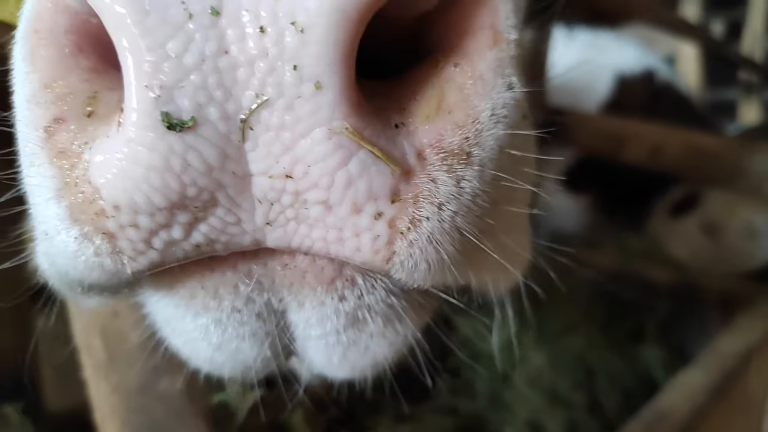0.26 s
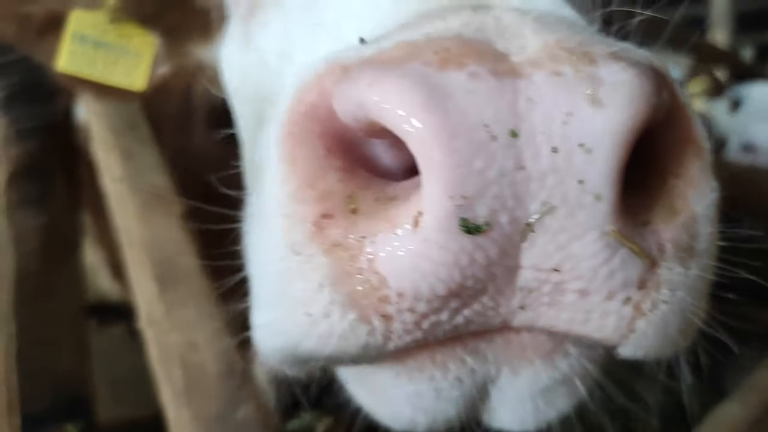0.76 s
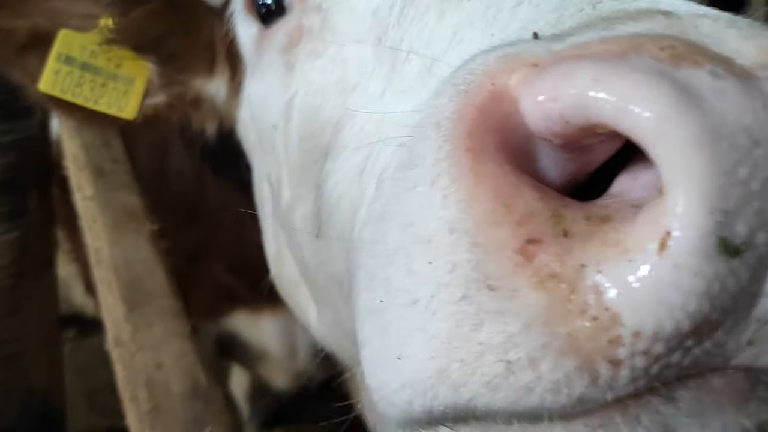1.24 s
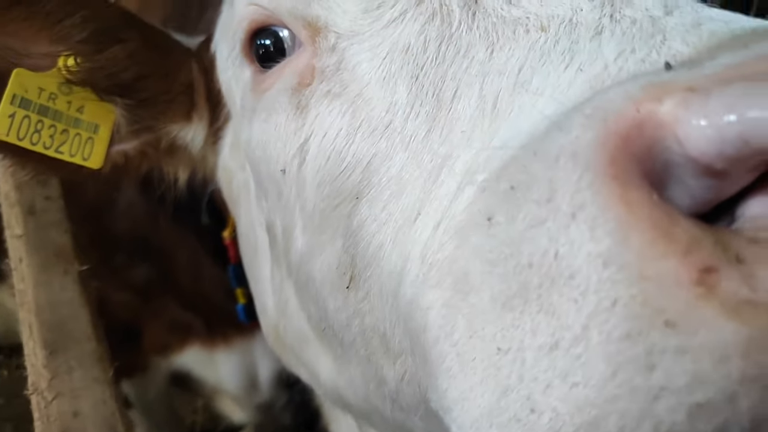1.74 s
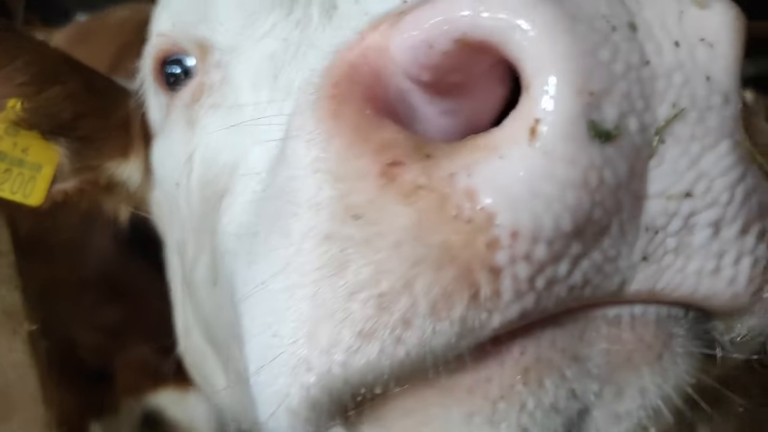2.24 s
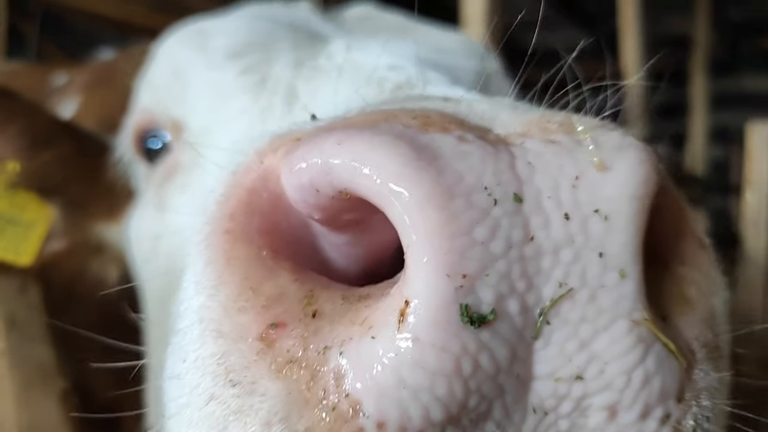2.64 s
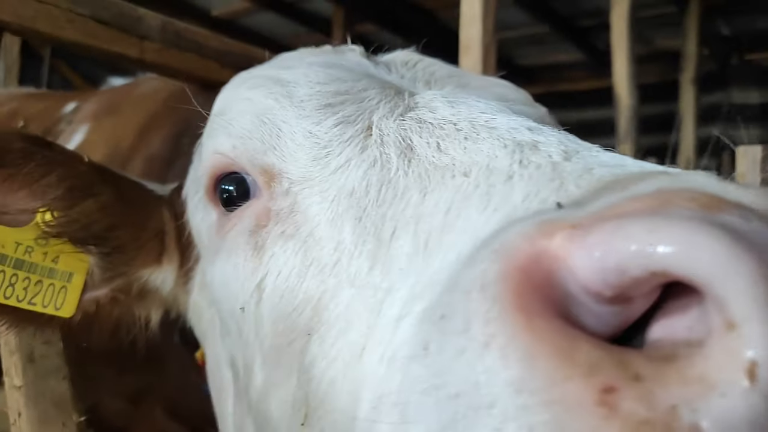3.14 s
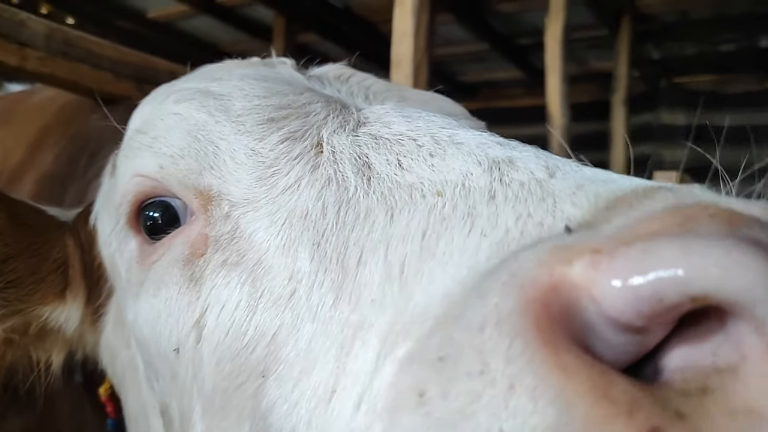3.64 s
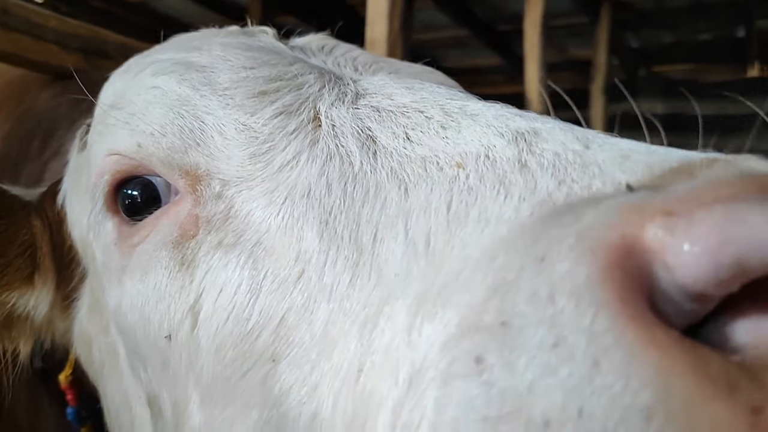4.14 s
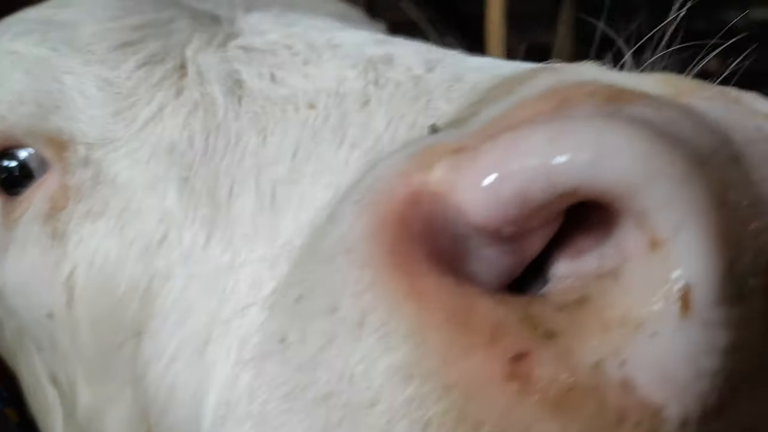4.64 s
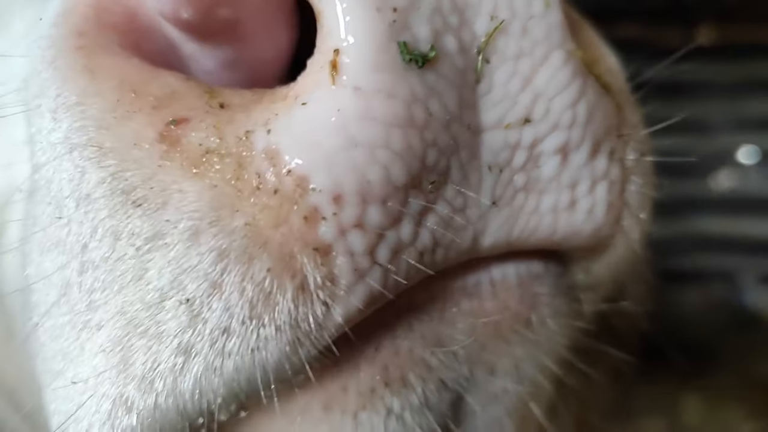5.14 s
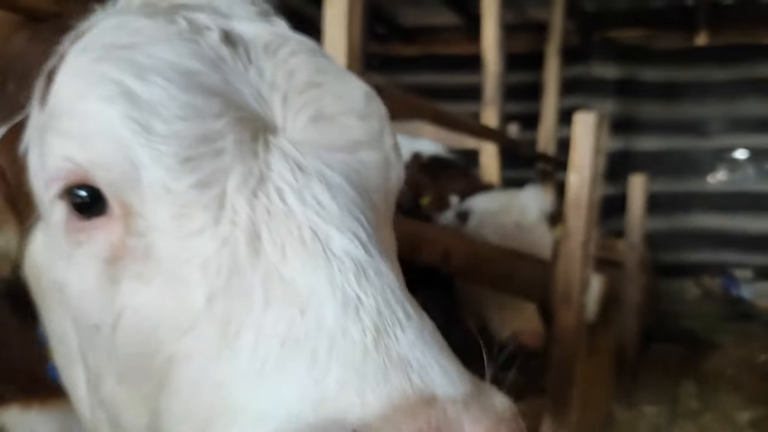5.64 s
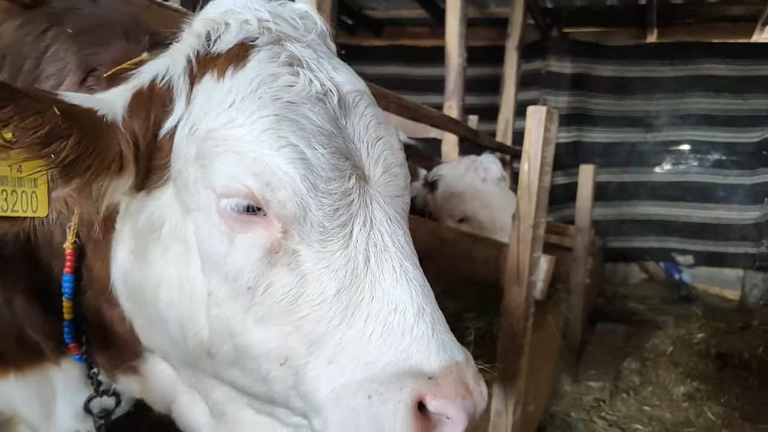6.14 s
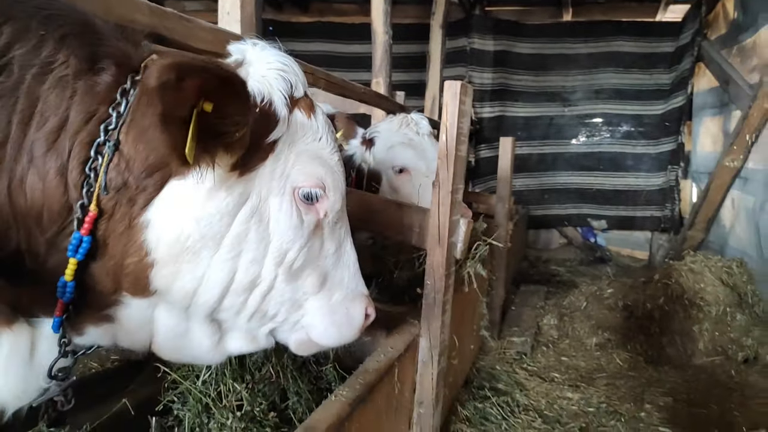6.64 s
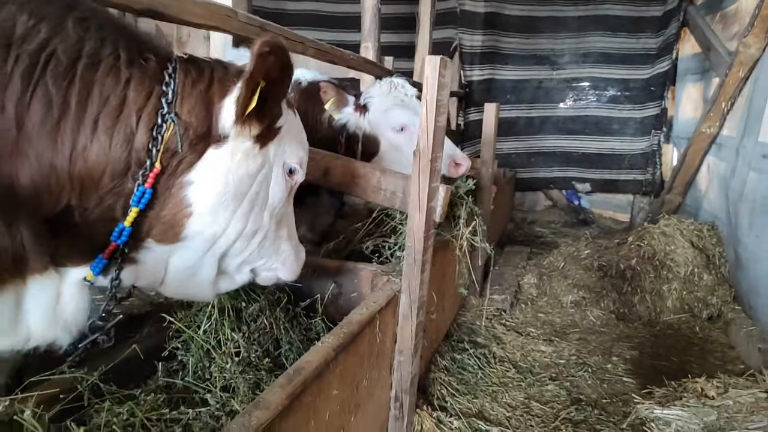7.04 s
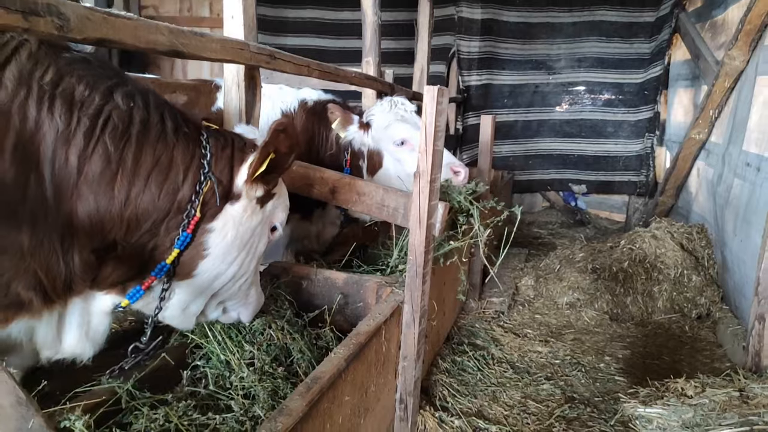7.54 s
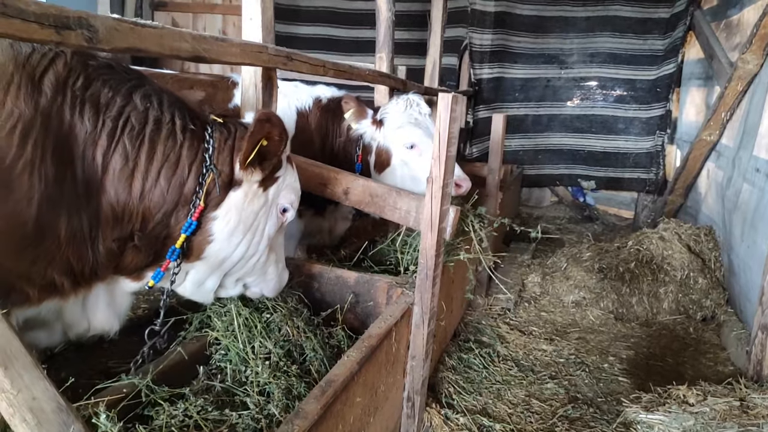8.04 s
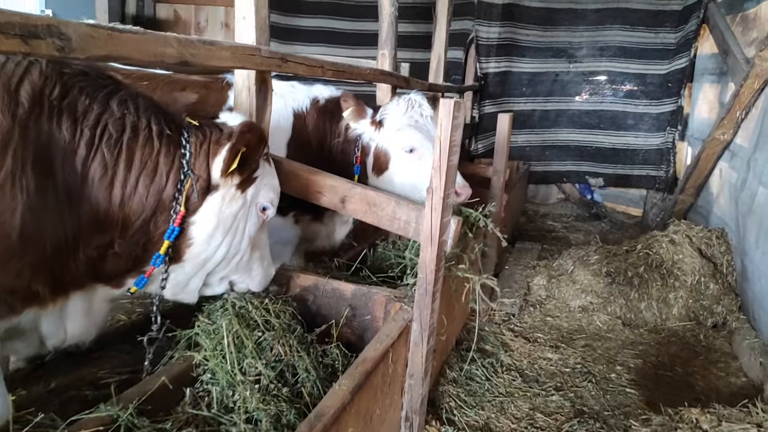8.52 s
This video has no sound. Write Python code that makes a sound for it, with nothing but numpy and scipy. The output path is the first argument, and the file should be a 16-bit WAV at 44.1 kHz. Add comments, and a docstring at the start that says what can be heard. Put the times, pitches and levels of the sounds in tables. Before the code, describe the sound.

A cow's muzzle snuffles right against the microphone while hay rustles and drags, chains clink and the wooden trough gets knocked in a barn.

```python
"""Hay swishes and drags in swells while a muzzle close to a two-port microphone snuffles.
Cattle feed at a wooden trough in a barn: chains clink, struck wood rings dully and planks are
knocked, with a short tail; low breaths and two snorts come later. Breath and hay are noise and
clicks through resonances, clinks are noise bursts with ringing modes, knocks drive the modes
of the trough. Still air hisses softly behind it all."""
import sys
import numpy as np
from scipy import signal
from scipy.fft import rfft, irfft, next_fast_len
from scipy.io import wavfile
from scipy.ndimage import uniform_filter1d

SR = 44100
rng = np.random.default_rng(int(sys.argv[2]) if len(sys.argv) > 2 else 0)


def wrap_up_sound(samples):
    """Save the sound to the file named by the first command line argument, as 16-bit audio."""
    columns = np.atleast_2d(samples).T
    # keep every value between -1 and 1, then stretch to whole-number steps
    tamed = np.clip(columns, -1, 1)
    steps = np.round(tamed * 32767).astype(np.int16)
    wavfile.write(sys.argv[1], SR, steps)


N = 387198  # samples


def gain_of(db):
    """Turns dB into a gain."""
    return 10 ** (np.asarray(db) / 20)


def evened(x):
    """Scales to rms 1."""
    return x / np.sqrt(np.mean(x ** 2) + 1e-20)


def wander(count, smooth):
    """Slow random curve of rms 1: noise averaged twice over a number of samples."""
    once = uniform_filter1d(rng.standard_normal(count), smooth)
    return evened(uniform_filter1d(once, smooth))


def read(points, hz):
    """Reads a table on a log-frequency axis."""
    f, value = np.transpose(points)
    return np.interp(np.log(hz + 1), np.log(f + 1), value)


def add(mix, s, sound):
    """Mixes a sound in at time s."""
    part = mix[round(s * SR):][:len(sound)]
    part += sound[:len(part)]


def causal(db):
    """Minimum-phase taps for a gain in dB given on 2049 bins."""
    log_gain = np.log(gain_of(np.concatenate([db, db[-2:0:-1]])))
    return np.fft.ifft(np.exp(np.conj(signal.hilbert(log_gain)))).real[:2048]


def coloured(x, points):
    """Filters both ports by a spectrum table."""
    taps = causal(read(points, np.fft.rfftfreq(4096, 1 / SR)))
    return signal.oaconvolve(x, taps[None], axes=1)[:, :N]


# How alike the two microphone ports hear a sound.
# Each row: frequency in Hz, likeness from 0 to 1.
LIKENESS = [(30, 0.2), (130, 0.8), (300, 1), (700, 0.037), (1500, 0.28), (4000, 0.0038), (15000, 0.017)]


def ports(x):
    """Blends two unrelated signals into a pair most alike near 300 Hz and unalike in the treble."""
    size = next_fast_len(x.shape[1])
    a, b = rfft(x, size)
    same = np.clip(read(LIKENESS, np.fft.rfftfreq(size, 1 / SR)), 0, 1)
    right = same * a + np.sqrt(1 - same ** 2) * b
    return irfft(np.array([a, right]), size)[:, :x.shape[1]]


def swells(rows, order):
    """Each row rises to its peak and falls away; column `order` holds its dB; rows add in power."""
    drop_db, bend = -20, 1.6  # drop at the end of a rise or fall, roundness of the top
    t, power = np.arange(0, N + 64, 64) / SR, 0
    for row in rows:
        peak, rise, fall = row[:3]
        away = np.where(t < peak, (peak - t) / max(rise, .02), (t - peak) / max(fall, .02))
        power += gain_of(row[order] + drop_db * away ** bend) ** 2
    return np.interp(np.arange(N) / SR, t, np.sqrt(power))


def grit(per_s, spread_db, hiss, clump_db):
    """Clicks of uneven size over a bed of smooth noise, swelling and thinning in clumps."""
    size = gain_of(spread_db * np.minimum(rng.exponential(1, (2, N)), 4))
    clicks = size * (rng.random((2, N)) < per_s / SR)
    noise = rng.standard_normal((2, N))
    clumps = wander(N, 700)
    return gain_of(clump_db * clumps) * ports(evened(clicks * np.sign(noise[::-1]) + hiss * noise))


def snaps(low_hz, high_hz, per_s, cycles, spread_db, count):
    """Stalks of many sizes break: short damped grains, each size with its own sparse train."""
    out, t = np.zeros((2, N)), np.arange(1500) / SR
    for hz in np.geomspace(low_hz, high_hz, count):
        draw = rng.random((3, N))
        train = gain_of(-spread_db * np.log(draw[2] + 0.0098)) * (draw[:2] < per_s / count / SR)
        grain = np.sqrt(hz) * np.exp(-t * hz / cycles) * np.sin(2 * np.pi * hz * t)
        out += signal.oaconvolve(train, grain[None], axes=1)[:, :N]
    return evened(ports(out))


def ringing(hz, modes, seconds, stretch=1, rise_s=1e-5):
    """A sum of dying partials over a base pitch."""
    t = np.arange(round(seconds * SR)) / SR
    partials = 0
    for ratio, db, t60 in modes:
        partials = partials + gain_of(db - 60 * t / (t60 * stretch)) * np.sin(2 * np.pi * hz * ratio * t)
    return partials * (1 - np.exp(-t / rise_s))


def hollow(noise, hz, width_hz):
    """Noise through one resonance that follows the pitch curve hz."""
    turn = np.exp(2j * np.pi * np.cumsum(hz) / SR)
    r = np.exp(-np.pi * width_hz / SR)
    slow = signal.lfilter([1 - r], [1, -r], noise / turn)  # the resonance shifted down to 0 Hz
    return evened(ports((turn * slow).real))


# Colour of the still air in the barn. Each row: frequency in Hz, relative level in dB.
AIR = [(20, -16), (70, -23), (150, 14.5), (230, -11), (600, 3.5), (2000, -58), (5000, -10), (10000, -10),
       (16000, -3)]


def still_air():
    """Steady coloured noise at both ports, the quiet bed of the barn."""
    return gain_of(-44.5) * evened(coloured(ports(rng.standard_normal((2, N))), AIR))


# Tugs at the hay. Each row: peak time in seconds, rise in seconds, fall in seconds,
# swish level in dB, level in dB of the weight dragging on the planks.
TUGS = [(0.02, 0.9, 0.18, -47.5, -48.5), (.44, 0.46, 0.18, -45, -46), (1.0, 0.69, 0.42, -49.5, -47),
        (1.3, 0.36, 0.29, -39, -37), (1.8, 0.45, 0.42, -43.5, -47.5), (2.27, 0.26, 0.15, -41.5, -52),
        (2.62, 0.69, 0.49, -45, -53), (3.21, 0.2, 0.24, -44.5, -42), (3.57, 0.053, 0.28, -46, -57),
        (3.86, 0.12, 0.25, -37.5, -36), (4.3, 0.4, 0.32, -47, -52), (4.62, 0.23, 1, -50, -62),
        (5.13, 0.43, 0.23, -41, -61), (5.36, 0.38, 0.12, -28.5, -25), (5.6, 0.5, 0.35, -32, -26.5),
        (6.14, 0.12, 0.18, -43, -39.5), (6.4, 0.87, 0.25, -43.5, -51), (6.76, 0.16, 0.32, -33.5, -25.5),
        (6.95, 0.095, 0.2, -26.5, -24), (7.25, 0.16, 0.11, -52, -50.5), (7.45, 0.095, 0.24, -69, -45),
        (7.6, 0.13, .15, -60, -49), (7.76, 0.17, 0.52, -38.5, -31), (8.1, 0.47, 0.52, -33.5, -38.5),
        (8.31, 0.16, 0.21, -47, -60), (8.7, 0.14, 0.5, -44.5, -82)]
# Colour of the sliding stalks. Each row: frequency in Hz, relative level in dB.
SWISH = [(200, -2), (800, -2), (1500, -18), (2300, 6.5), (4000, -0.5), (8000, -3.5), (11000, -8.5),
         (16000, -12)]
# Colour of the dragging bundle. Each row: frequency in Hz, relative level in dB.
DRAG = [(60, -8), (200, -39.5), (345, -1.5), (430, -1), (610, 2.5), (800, -0.5), (1000, -2), (1600, -6.5),
        (3000, -31.5)]


def hay():
    """Stalks snap and slide in a dense swish; the bundle's weight rumbles through the planks."""
    swish = evened(coloured(grit(per_s=900, spread_db=3.5, hiss=1.3, clump_db=1.6), SWISH))
    swish += 0.45 * snaps(1157, 8810, per_s=640, cycles=10.0, spread_db=7.0, count=14)
    drag = evened(coloured(grit(per_s=250, spread_db=0.0, hiss=1.4, clump_db=2.0), DRAG))
    drag += 0.45 * snaps(304, 1800, per_s=150, cycles=9.0, spread_db=6.5, count=8)
    rubbing = grit(per_s=120, spread_db=4.5, hiss=0.81, clump_db=3.0)
    trough = ringing(1.0, PLANK, .15)  # the trough rings along
    drag += 0.58 * evened(signal.oaconvolve(rubbing, trough[None], axes=1)[:, :N])
    return swells(TUGS, order=3) * swish + swells(TUGS, order=4) * drag


# Breaths through the nose, close to the ports. Each row: peak time in seconds, rise in seconds,
# fall in seconds, snuffle level in dB, level in dB of the air stirred at the ports.
BREATHS = [(.14, 1, 0.61, -44, -44), (.385, 0.06, 0.16, -34, -42), (.64, .06, 0.049, -36.5, -50),
           (.82, 0.46, 0.9, -38, -43), (1.27, 0.15, 0.37, -25.5, -37), (1.52, 0.64, 0.21, -28.5, -43),
           (1.85, 0.2, 0.091, -29, -33), (2.06, 0.12, 0.12, -44.5, -43), (2.27, 0.092, 0.21, -31, -35),
           (2.5, 0.17, 0.43, -41, -44), (2.72, 0.49, 0.13, -36, -58), (3.14, 0.68, 0.4, -44, -48),
           (3.6, 0.27, 0.15, -46, -50), (3.9, .3, 0.33, -38, -37), (4.3, 0.18, 0.75, -42.5, -51),
           (4.62, 0.45, 0.11, -40, -65), (4.87, 0.32, 0.42, -37.5, -39), (5.06, 0.13, 0.085, -34, -42),
           (5.28, 0.34, 0.094, -42, -44), (5.62, 0.38, 0.23, -38, -44), (5.85, 0.37, 0.42, -39, -49),
           (6.35, 0.67, 0.68, -43.5, -50), (6.82, 0.17, 0.23, -35.5, -57), (7.06, 0.27, 0.25, -38, -55),
           (7.45, 0.26, 0.25, -36.5, -43), (7.82, 0.45, 0.64, -42, -62), (8.17, 0.22, 0.24, -58, -43),
           (8.36, 0.26, 0.34, -43, -49), (8.75, 0.14, .4, -40, -49)]
# Low nasal resonances. Each row: frequency in Hz, width in Hz, relative level in dB.
NOSTRIL = [(172.3, 14, 10), (218.3, 23.7, 12), (333, 103, 1), (453, 13.4, 0.5)]


def snuffle():
    """Irregular flaps of the nostrils and breath noise excite the low nasal resonances."""
    flaps = grit(per_s=110, spread_db=0.5, hiss=1.0, clump_db=1.5)
    t = np.arange(3000) / SR
    nose = 0
    for hz, width, db in NOSTRIL:
        nose = nose + gain_of(db) * width * np.exp(-np.pi * width * t) * np.cos(2 * np.pi * hz * t)
    nose = signal.sosfilt(signal.butter(4, 115, "high", fs=SR, output="sos"), nose)
    return swells(BREATHS, order=3) * evened(signal.oaconvolve(flaps, nose[None], axes=1)[:, :N])


# Colour of the stirred air. Each row: frequency in Hz, relative level in dB.
DRAUGHT = [(15, -4), (30, 4.5), (70, 4.5), (100, 8.5), (140, -32), (300, -55)]


def draught():
    """Breath stirs the air at the ports: a deep, soft rumble."""
    return swells(BREATHS, order=4) * evened(coloured(ports(rng.standard_normal((2, N))), DRAUGHT))


# Clinks of the chains and duller rings of struck wood. Each row: time in seconds,
# crack level in dB before the mix, level in dB of the thud relative to the crack,
# pitch in Hz that the ring favours, ring level in dB before the mix.
CLINKS = [(0.2445, -24, -22, 4100, -42.5), (0.2451, -36, -19, 4560, -36), (0.3597, -26.5, -10, 3990, -58),
          (0.849, -37, -6, 7900, -54), (0.8922, -61, -9.5, 8300, -41.5), (0.893, -56, -8, 8960, -47),
          (0.9493, -26, -26, 11000, -43), (1.147, -37.5, 9, 7660, -63), (1.221, -26.5, 2, 7660, -64),
          (1.39, -38, -2, 8020, -41), (1.7503, -27.5, -23, 7900, -66), (1.909, -56, -12, 7900, -47.5),
          (2.417, -38, -15, 3990, -40.5), (2.488, -32, -12, 4000, -45), (2.4872, -44, -6, 2300, -46),
          (2.593, -29.5, -12, 2900, -35), (2.596, -51, -10, 3760, -47), (2.6715, -38, -27, 3990, -42),
          (2.75, -45, -20, 3870, -46), (3.1164, -36, 2.5, 1680, -47.5), (3.121, -45, -2, 2570, -41),
          (3.14, -46, -20, 3850, -48), (3.204, -25.5, -21, 1700, -47), (3.3067, -27.5, -35, 8960, -52.5),
          (3.431, -29.5, -34, 8290, -71), (3.495, -28, -36, 11200, -48), (3.644, -33, -30, 5800, -29.5),
          (3.6448, -28, 9, 6580, -50), (3.757, -34.5, 10, 1130, -50), (3.784, -21, 7, 6580, -25),
          (3.8045, -36, -20, 2020, -28), (3.8394, -35, -8, 2570, -36), (4.011, -45, -28, 7000, -48),
          (4.02, -54, -31, 7150, -43), (4.013, -30, -29, 14000, -40), (4.2427, -38.5, 5.5, 2300, -40),
          (4.261, -54, -1, 1680, -58), (4.367, -55, -4, 1655, -53), (4.2413, -18, -29, 8480, -49.5),
          (4.244, -46, -13, 3820, -48), (4.3642, -20, -30, 3700, -43), (4.37, -52, -20, 6580, -45),
          (4.605, -27, -25, 3700, -47.5), (4.8897, -26.5, -18, 3700, -40.5), (4.89, -45, -10, 4480, -52),
          (4.984, -37.5, 7, 2300, -39), (4.9193, -33, -19, 6580, -41), (5.409, -13.5, -25, 7900, -42),
          (5.5341, -40.5, 23.5, 2570, -54), (5.929, -23, -34, 3700, -44), (6.0165, -24, -2, 1690, -57),
          (6.0202, -15, -10.5, 7040, -40), (6.03, -45, 9, 780, -28), (6.04, -53, -1, 1193, -29.5),
          (6.074, -46, 6, 1070, -41), (6.169, -45, 10, 1360, -39.5), (6.337, -48, -10, 3700, -44.5),
          (6.5006, -21, -7, 7900, -61), (6.571, -36.5, 5.5, 3700, -41.5), (6.6436, -27, -2, 3700, -55),
          (6.7273, -31, 12, 3700, -52), (6.79, -32, 14.5, 7900, -57), (6.8506, -15, -11, 7900, -49),
          (6.8899, -25.5, 14, 7900, -44), (7.25, -47, -8, 3700, -52), (7.3328, -26.5, -18, 2300, -53),
          (7.3964, -42, 7.5, 1130, -50), (7.483, -36, -26, 2900, -57), (7.518, -37.5, 9.5, 2050, -42),
          (7.5861, -29, -1.5, 2900, -42), (7.632, -41, 14, 1690, -40), (7.654, -38, 13, 6580, -55),
          (7.673, -32, 14, 2900, -51), (7.7235, -31, 11.5, 2900, -25.5), (7.7854, -21.5, 1, 8290, -41),
          (7.81, -23, 5.5, 7900, -38), (7.975, -40.5, 16, 7900, -61), (8.0195, -32, 11.5, 6200, -36),
          (8.089, -22.5, -12, 7900, -51), (8.238, -39, 14, 1700, -35), (8.306, -38, 14.5, 1700, -62),
          (8.6396, -25.5, -29, 7660, -70), (8.6988, -38, -24.5, 7660, -53)]


def cracks_and_thuds():
    """Each clink starts as a brief rattle that swells in a moment and dies, over a dull thud."""
    crack_t60, tick_t60, tick_below_db = .04, .012, -25  # s, s, dB: hardly any thud makes a short tick
    out, t = np.zeros(N), np.arange(6000) / SR
    cracks = rng.standard_normal((len(CLINKS), len(t)))
    dull = signal.butter(1, [500, 2200], "band", fs=SR, output="sos")  # thud of the wood
    for noise, (s, db, body_db, _, _) in zip(cracks, CLINKS):
        t60 = crack_t60 if body_db > tick_below_db else tick_t60
        shape = gain_of(db - 60 * t / t60) * (1 - np.exp(-t / 0.0003))
        thud = gain_of(body_db) * evened(signal.sosfilt(dull, noise))
        add(out, s - .0004, shape * (signal.lfilter([.7, .3], [1], noise) + thud))
    return out


# Modes of the chains and struck pieces. Each row: frequency in Hz before the pieces' spread
# in size, level in dB when rung along, t60 in seconds.
RING_MODES = [(1130, -17, 0.34), (1690, -6, 0.65), (2300, -2.5, 0.065), (2570, -3, 0.12), (2900, 8, 0.13),
              (3700, 1.5, 0.36), (3990, -15, 0.1), (4060, -15, 1), (4570, -16, 0.19), (6580, 6, 0.051),
              (7040, -1, 0.29), (7660, -18, 0.22), (7900, -11, 0.52), (8290, -5, 0.78), (8960, -10, 0.64),
              (11200, -13, 0.82), (14000, -3, 0.44)]
# Partials of one mode, a long ring in a cluster of short ones.
# Each row: frequency ratio, level in dB, share of the mode's t60.
OVERTONES = [(1, -3, 1), (1.008, -5, .3), (1.02, 0, .1), (.976, -3, .08)]


def struck_rings():
    """Every clink or struck piece rings, its nearest mode set on the pitch; rubbing flickers the ring."""
    favour_db_per_octave, faintest_db, size_spread = -200, -16, .06  # far modes are weak; sizes differ
    out = np.zeros(N)
    mode_hz, along_db, _ = np.transpose(RING_MODES)
    sizes = 1 + size_spread * (rng.random((len(CLINKS), len(RING_MODES))) - .5)
    for size, (s, _, _, pitch_hz, db) in zip(sizes, CLINKS):
        octaves = abs(np.log2(mode_hz / pitch_hz))
        nearest = octaves.argmin()
        size[nearest] = pitch_hz / mode_hz[nearest]
        weaker_db = np.maximum(favour_db_per_octave * (octaves - octaves.min()), faintest_db) + along_db
        weaker_db[nearest] = 0
        for (hz, _, t60), share, less_db in zip(RING_MODES, size, weaker_db):
            ring = ringing(hz * share, OVERTONES, min(t60, .6), stretch=t60, rise_s=.0006)
            add(out, s, gain_of(db + less_db) * ring)
    return out * gain_of(3.2 * wander(N, 350))


# Blows on the planks. Each row: time in seconds, peak level in dB in the near mix before the bass is # taken
# off, pitch in Hz of the spot struck, time in seconds for the scrape to reach its height.
KNOCKS = [(0.254, -21.5, 660, 0.0031), (0.452, -42, 257, 0.008), (0.955, -21.5, 444, 0.003),
          (1.141, -51, 259, 0.0052), (1.174, -18, 275, 0.0096), (1.242, -22, 288, 0.0029),
          (1.602, -60, 584, 0.0069), (3.128, -25.5, 500, 0.0064), (3.647, -0.5, 473, 0.0015),
          (3.673, -14, 308, 0.0014), (3.759, -9, 1460, 0.002), (3.783, -7.5, 650, 0.0014),
          (3.79, -10, 364, 0.0056), (3.803, -23, 400, 0.0037), (3.842, -13, 665, 0.0078),
          (3.867, -20, 680, 0.0099), (4.771, -27, 380, 0.0027), (5.019, -19, 350, 0.0068),
          (5.265, -19, 384, 0.0067), (5.415, -4, 617, 0.0072), (5.47, -17.5, 600, 0.0074),
          (5.533, -12, 330, 0.0041), (5.63, -18, 620, 0.0069), (6.024, -16.5, 790, 0.0085),
          (6.041, -14.5, 1180, 0.0087), (6.076, -23.5, 1090, 0.012), (6.121, -31, 1300, 0.018),
          (6.171, -23, 1410, 0.0085), (6.38, -27, 346, 0.0034), (6.513, -22, 420, 0.022),
          (6.648, -8.5, 430, 0.0038), (7.338, -37, 350, 0.008), (7.402, -23, 433, 0.0026),
          (7.481, -52, 471, 0.006), (7.526, -24.5, 437, 0.0052), (7.686, -14.5, 695, 0.0087),
          (7.9, -23, 710, 0.014), (7.99, -22, 710, .015), (8.65, -36.5, 342, 0.0056),
          (8.711, -37.5, 305, 0.005)]
# Modes of the trough. Each row: frequency in Hz before each blow's detuning,
# level in dB before the spot struck favours some, t60 in seconds.
PLANK = [(305, -15, 0.071), (365, -10, 0.15), (433, -6.5, 0.14), (490, 0.5, 0.061), (644, -10, 0.075),
         (692, 10, 0.033), (784, 1, 0.059), (934, 6.5, 0.037), (1182, 1, 0.077), (1477, -0.5, 0.078),
         (1058, 4, 0.12), (1292, 5.5, 0.029), (1690, -14, 0.044), (1860, 6, 0.017), (2020, -1.5, 0.095),
         (2540, 8, 0.017), (2900, 13.5, 0.015)]


def planks():
    """One sharp push, then a rough scrape; the spot struck favours the modes near its own pitch."""
    spot_spread = .08  # planks differ a little in tuning
    out, t = np.zeros(N), np.arange(2000) / SR
    rough = rng.standard_normal((len(KNOCKS), len(t)))
    tuning = 1 + spot_spread * (rng.random((len(KNOCKS), len(PLANK))) - .5)
    for grain, tune, (s, db, hz, length) in zip(rough, tuning, KNOCKS):
        u = t / max(length, 5e-4)
        scrape = 0.98 * u * np.exp(-u) * grain
        push = np.exp(-((t - .0015) / 0.000066) ** 2) + scrape
        modes = []
        for k, (f, mode_db, t60) in zip(tune, PLANK):
            modes.append((f * k, mode_db - 13 * abs(np.log2(f / hz)), t60))
        knock = signal.fftconvolve(push, ringing(0.98, modes, 0.16))
        add(out, s - .003, gain_of(db + 2.5) * knock / abs(knock).max())
    return out


# How the barn dies away. Each row: frequency in Hz, t60 in seconds.
BARN = [(150, 0.43), (500, 0.26), (1500, 0.35), (4000, 0.42), (8000, 0.22), (15000, 0.025)]


def barn(x, count=3):
    """Sparse echoes dying band by band; several tails take turns, so blows are answered differently."""
    out = 0
    for k in range(count):
        taps = np.zeros((2, SR))
        # one echo of random sign in every 20 samples
        at = np.arange(180, SR - 20, 20) + rng.integers(0, 20, (2, (SR - 181) // 20))
        np.put_along_axis(taps, at, rng.choice([-1., 1.], at.shape), 1)
        hz, t, z = signal.stft(taps, SR, nperseg=256)
        dying = z * gain_of(-60 * t / read(BARN, hz)[:, None])
        tail = ports(signal.istft(dying, SR, nperseg=256)[1])
        share = np.sqrt(2 / count) * np.cos(np.pi * (np.arange(N) / SR * 7 + k / count))
        out += signal.fftconvolve((x * share)[None], tail / np.linalg.norm(tail[0]), axes=1)[:, :N]
    return out


# Low breaths. Each row: peak time in seconds, rise in seconds, fall in seconds, level in dB.
LOW_BREATHS = [(3.2, .25, 0.17, -39), (4.65, 0.067, 0.075, -39), (5.9, 0.63, 0.14, -51),
               (7.15, 0.23, 0.2, -48), (8.32, 0.18, 0.23, -39.5), (8.75, 0.096, .2, -49)]


def low_breaths():
    """Soft swells of breath noise in one narrow resonance near 154 Hz."""
    low_hz, width_hz = 153.7, 31  # the width sets how fast the resonance dies
    t = np.arange(6000) / SR
    resonance = t * np.exp(-np.pi * width_hz * t) * np.sin(2 * np.pi * low_hz * t)
    breath = signal.oaconvolve(rng.standard_normal(N), resonance)[:N]
    return swells(LOW_BREATHS, order=3) * evened(breath)


# Hard breaths out through the nose. Each row: start in seconds, length in seconds,
# level in dB, highest nostril resonance in Hz.
SNORTS = [(5.053, 0.82, -37, 2470), (6.716, .42, -36, 2310)]


def snorts():
    """Breath noise in a nostril resonance that climbs as the flow rises, over a fixed lower cavity."""
    low = 0.32  # resonance at no flow as a share of its top
    ends_db, flutter_db = -4, 4.5
    sinus_hz, sinus_width_hz, sinus_db = 600, 16, -5.5  # a cavity that the flow does not move
    out = np.zeros((2, N))
    for s, length, db, top_hz in SNORTS:
        t = np.arange(0, length, 1 / SR)
        flow = np.sqrt(np.sin(np.pi * t / length))
        flutter = wander(len(t), 1000)
        noise = rng.standard_normal((2, 2, len(t)))
        jet = hollow(noise[0], top_hz * (low + (1 - low) * flow), 150)
        jet = jet + gain_of(sinus_db) * hollow(noise[1], sinus_hz + 0 * t, sinus_width_hz)
        level = gain_of(db + ends_db * (1.0 - flow) + flutter_db * flutter)
        for port, sound in zip(out, level * jet * signal.windows.tukey(len(t), .5)):
            add(port, s, sound)
    return out


def scene():
    """Blows with their barn tail over breath, hay and the still air of the barn."""
    small = signal.butter(2, 190, "high", fs=SR, output="sos")  # small parts radiate no bass
    cracks = signal.sosfilt(small, cracks_and_thuds())
    knocks = signal.sosfilt(small, planks())
    rings = struck_rings()
    near = cracks * gain_of(-5.4) + knocks * gain_of(-2.5) + rings * gain_of(5.0)
    near = near + hay() + snuffle() + draught() + low_breaths() + snorts()
    thrown_back = gain_of(-.5) * cracks + gain_of(-4.5) * knocks + gain_of(-7) * rings
    return near + barn(thrown_back) + still_air()


def roll_off(x):
    """The treble ends steeply here."""
    return signal.sosfilt(signal.butter(12, 15400, fs=SR, output="sos"), x)


# Response of the microphone. Each row: frequency in Hz, gain in dB.
MIC = [(20, -15.5), (90, -15), (140, -3), (4000, 0.5), (5000, 0), (6500, 5.5), (7800, 12), (8600, 6),
       (9300, -1.5), (9900, -6), (11000, -5.5), (15500, -10.5), (22050, -3)]
# How much louder the left port is than the right. Each row: frequency in Hz, difference in dB.
LOUDER_LEFT = [(60, 0.5), (150, 2.5), (380, 3.5), (950, 3), (2380, 2.5), (5980, -0.5), (15000, 0)]


def record(dry):
    """Two ports with a treble peak; the left one is reached later and favours bass and middle."""
    left_lag = 20  # samples
    hz = np.fft.rfftfreq(4096, 1 / SR)
    mic, tilt = read(MIC, hz), read(LOUDER_LEFT, hz) / 2
    left_taps = np.convolve(causal(mic + tilt), np.arange(left_lag + 1) == left_lag)
    left = signal.oaconvolve(dry[0], left_taps)[:N]
    right = signal.oaconvolve(dry[1], causal(mic - tilt))[:N]
    return roll_off(np.array([left, right]))


dry = scene()
out = record(dry)
wrap_up_sound(out)
```